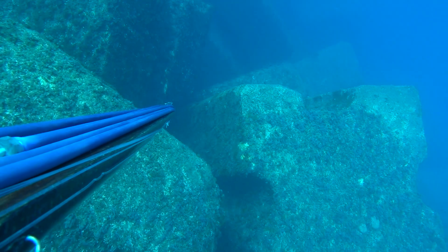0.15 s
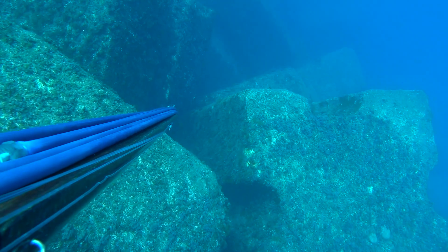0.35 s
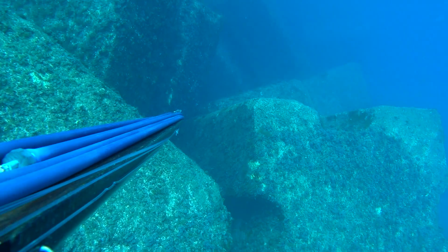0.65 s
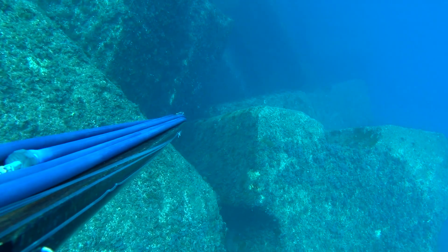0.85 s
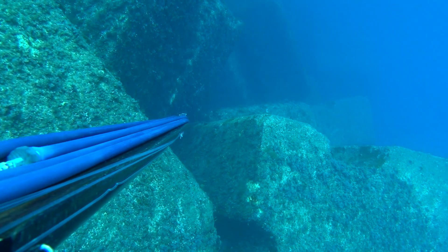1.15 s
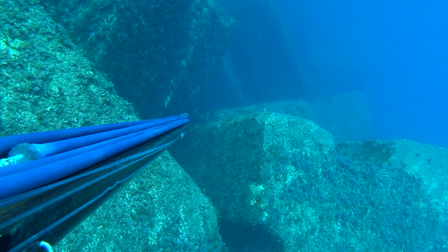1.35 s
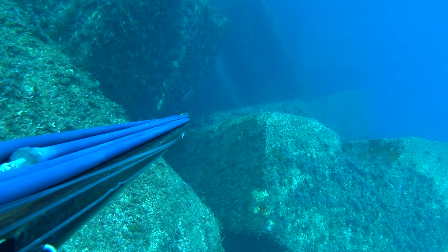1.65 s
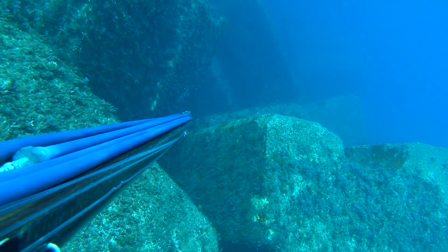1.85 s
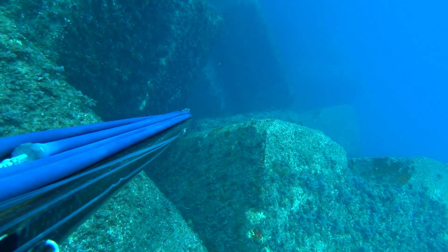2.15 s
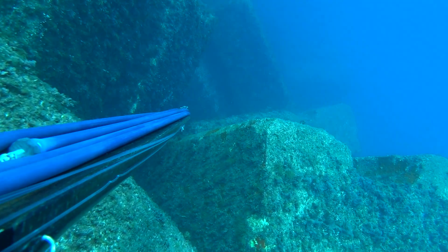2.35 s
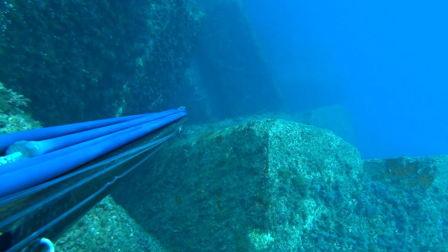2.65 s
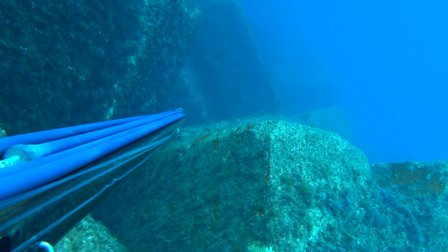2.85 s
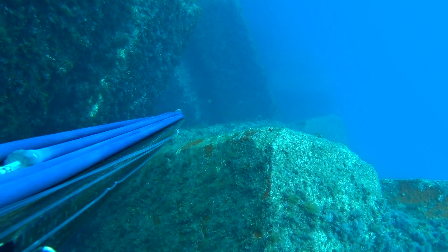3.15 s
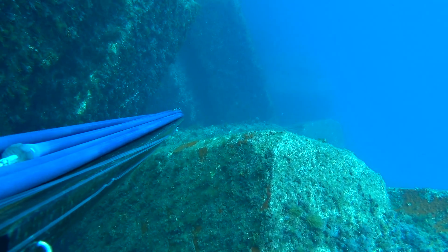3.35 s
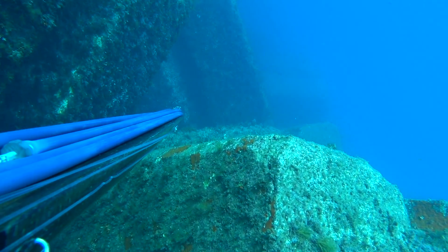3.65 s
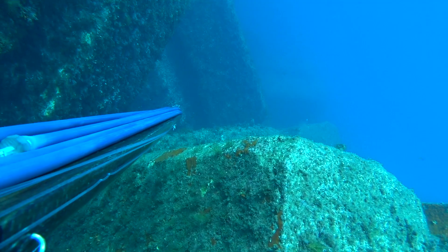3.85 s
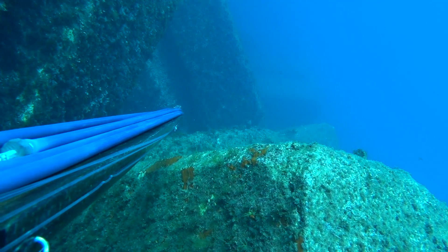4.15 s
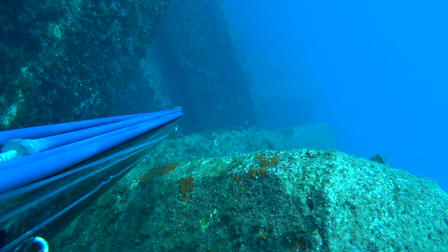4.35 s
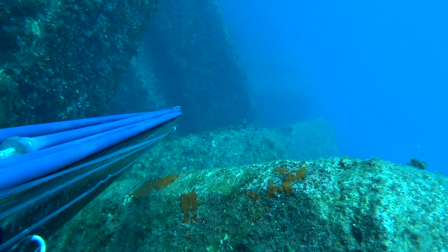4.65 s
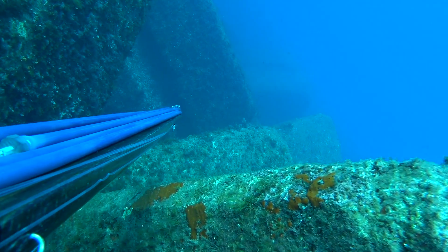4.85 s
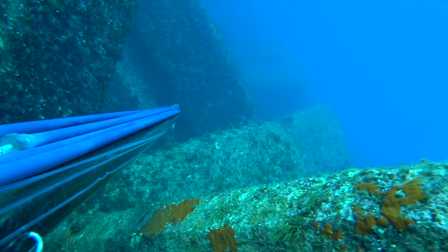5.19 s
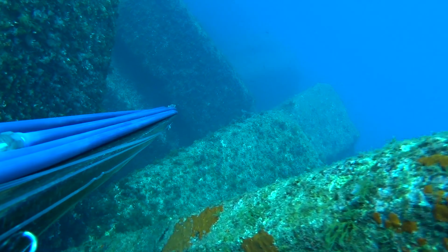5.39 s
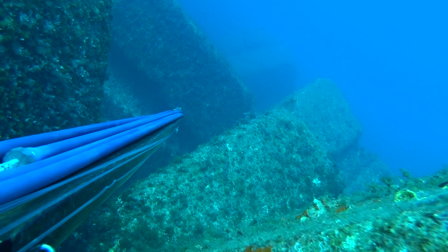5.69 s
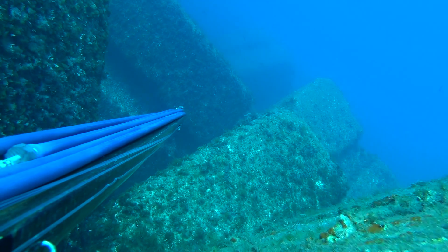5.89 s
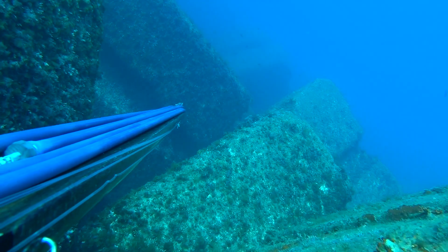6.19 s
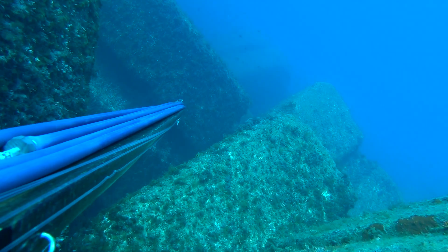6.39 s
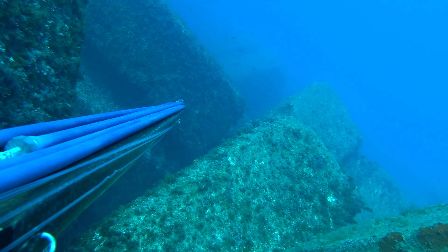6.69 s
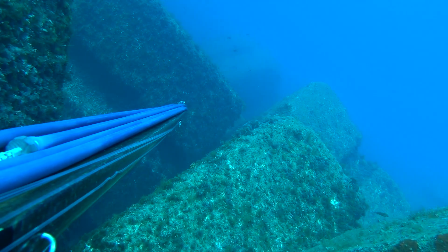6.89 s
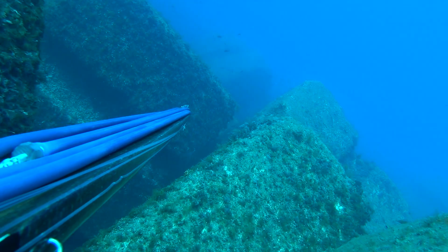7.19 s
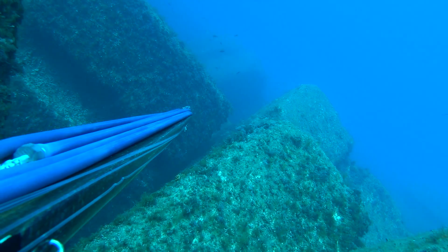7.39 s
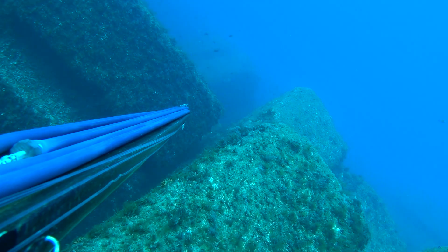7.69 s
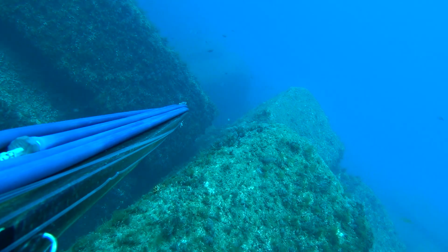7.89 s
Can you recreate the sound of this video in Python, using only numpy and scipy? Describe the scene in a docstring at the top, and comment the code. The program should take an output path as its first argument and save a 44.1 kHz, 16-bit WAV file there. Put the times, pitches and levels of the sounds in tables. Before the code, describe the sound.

Muffled water rumbles past a diver's gear while soft creaks, scattered shrimp clicks, a few hard knocks and dull thuds come and go.

```python
"""Water rumbles past at once, swaying and rubbing a camera's sealed housing on a diver's gear among rocks.
Shrimp snap near and far; mount knocks, soft creaking slips, dull bumps and scuffs come mingled throughout.
Rumble is coloured noise and sway two noisy low modes, both straight at the two microphones.
Rubbing, snaps, mount touches and bumps are noise or clicks ringing the housing modes.
Hiss and a faint electronic whine lie underneath."""
import sys
import numpy as np
from scipy import signal
from scipy.fft import rfft, irfft
from scipy.io import wavfile

SR = 44100
rng = np.random.default_rng(int(sys.argv[2]) if len(sys.argv) > 2 else 0)


def wav_record(signal):
    """Record a signal, one row per channel, as 16-bit PCM in the file named by sys.argv[1]."""
    frames = np.transpose(np.atleast_2d(signal))
    bounded = np.clip(frames, -1, 1)
    # unit amplitude maps onto the largest positive 16-bit level
    quanta = np.round(bounded * 32767).astype(np.int16)
    wavfile.write(sys.argv[1], SR, quanta)


N = 354123

# Streaming water: t/s, rumble level/dB, nominal rub level/dB, upper rumble re deep/dB
FLOW = [(0, -42.5, -56, -6.5), (.7, -43, -53, 0.5), (1.5, -45.5, -54.5, 2.5), (2.25, -45.5, -53.5, 2),
        (3.0, -46.5, -55, 4), (3.75, -50, -55.5, 4.5), (4.5, -46, -55.5, -5), (5.1, -51, -56, -4),
        (6.0, -49, -56, -3.5), (6.75, -48.5, -55, -0.8), (7.3, -45, -55.5, -0.5), (8.03, -53.5, -55.5, 2.5)]
# In-phase rumble spectrum: f/Hz, relative density/dB per Hz
RUMBLE_MID = [(15, -3), (26, 3), (50, -6.5), (100, -14), (200, -26.5), (500, -42), (800, -79)]
# Opposed rumble spectrum: f/Hz, relative density/dB per Hz
RUMBLE_SIDE = [(15, -22), (35, -13), (100, -21), (200, -30), (500, -34), (800, -60)]
# Sway modes: f/Hz, width/Hz, relative level/dB
SWAY_MODES = [(62, 3, -1), (167, 5.6, -13)]
# Soft brushes on the housing: t/s, length/s, nominal level/dB
SCUFFS = [(0.516, 0.04, -51), (2.888, 0.18, -42), (4.303, 0.029, -45), (6.46, 0.04, -42),
          (7.39, 0.024, -62)]
# Near shrimp snaps: t/s, nominal level/dB, top octave re level/dB, low body re level/dB
SNAPS = [(0.0125, -48, -9, -25), (0.1405, -40, -19, -18), (0.15, -44, -22, -22), (0.159, -58, -21, -19),
         (0.2633, -51, -1, -20), (0.999, -21, -57, -43), (1.191, -50, -25, -25), (1.2647, -52, -18, -22),
         (1.2708, -45, -8, -22), (1.3473, -54, -6, -20), (1.428, -49, -13, -20), (1.466, -41, -36, -9),
         (1.5204, -55, -14, -25), (1.5318, -57, 0, -20), (1.8195, -30.5, -47, -35), (1.95, -60, 5, -20),
         (1.9934, -51, -13, -20), (2.6262, -45.5, -21, -25), (2.7906, -56, -16, -17),
         (2.84, -45.5, -9, -19), (2.8734, -48, -3, -14), (2.9925, -58, -25, -25), (2.997, -44, 0, -15),
         (3.18, -48.5, -9, -20), (3.2335, -46.5, -16, -12), (3.2717, -43.5, -24, -22),
         (3.2994, -52, -15, -20), (3.4369, -49, -7, -23), (4.3604, -54, 1, -20), (4.6438, -60, 7, -20),
         (4.677, -58, -5, -20), (4.699, -54, -1, -19), (4.8738, -50.5, -20, -20), (4.91, -46.5, -20, -4),
         (4.92, -53, -1, -20), (4.989, -49.5, -16, -20), (5.0337, -44.5, -25, -24), (5.1157, -48, -25, -8),
         (5.1755, -47, -30, 3), (5.34, -52.5, -15, 2.5), (5.372, -48.5, -11, -7), (5.516, -47.5, -20, -10),
         (5.6377, -49.5, 3, -27), (5.733, -55, -7, -20), (5.8486, -50, -19, -12), (5.9059, -50, -4, -10),
         (6.0726, -50, -17, -20), (6.1754, -53.5, 1, -4), (6.314, -49, -17, -13), (6.3412, -42, -33, -1.5),
         (6.692, -49, -17, -20), (6.746, -52, -9, -20), (6.768, -50, -3, -11), (6.779, -55, -15, -16),
         (6.7873, -48.5, 5, -5), (6.9071, -55.5, 8, -13), (6.93, -51.5, -17, -3), (7.012, -52, -19, -6),
         (7.051, -46, -18, -5), (7.086, -37.5, -28, -6), (7.1082, -45, -23, -7), (7.2728, -53.5, -6, 6),
         (7.5212, -43.5, -13, -6), (7.6959, -47, -10, -11), (7.7678, -45, -19, -16), (7.967, -42, -23, -6)]
# Mount knocks, mostly hard, a few soft: t/s, nominal level/dB, upper modes re level/dB,
# modes over 3.5 kHz further/dB
KNOCKS = [(0.0355, -31, -25, -2), (0.0578, -26, 8.5, 0.5), (0.0845, -31, 7.5, -2), (0.0985, -35, -14, -18),
          (0.1239, -29.5, 4.5, -7), (1.2041, -23, 10.5, -0.5), (1.6425, -31.5, 1.5, -1),
          (1.702, -30, 9.5, 1.5), (4.0034, -24.5, -27, 11), (7.753, -26.5, -29, 17.5),
          (7.7859, -29.5, 6.5, 4), (7.8361, -35, 4, -2.5), (7.8725, -30.5, 4, -2)]
# Nominal touches of one knock: delay/s, level/dB, modes over 3.5 kHz further/dB
REBOUNDS = [(0, 0, -0.5), (.0015, -7.5, -5), (.004, -12, -12)]
# Soft creaking slips: t/s, nominal level/dB, upper modes re level/dB
SLIPS = [(0.1374, -39, -15), (0.166, -47, -21), (0.196, -41, -25), (0.2762, -36.5, -21), (0.2911, -34, -19),
         (0.2998, -33.5, -23), (0.306, -38, -21), (0.3202, -33.5, -28), (0.3344, -44, -27),
         (0.349, -39, -21), (0.362, -35, -28), (0.382, -35, -26), (0.3962, -38, -21), (0.407, -37, -25),
         (0.4156, -34, -10.5), (0.4282, -34, -24), (0.4363, -37, -22), (0.4485, -32, -21),
         (0.465, -35, -25), (0.5062, -34, -26), (0.5301, -48, -28), (0.627, -42, -16), (0.6407, -36.5, -14),
         (0.6756, -41, -21), (0.6927, -45, -23), (0.7194, -37, -31), (0.863, -39, -16), (0.8773, -42, -21),
         (0.9202, -38.5, -21), (1.0052, -35, -27), (1.0185, -42, -21), (1.028, -34.5, -12),
         (1.0402, -33, -24), (1.051, -43, -21), (1.0717, -37, -17), (1.2554, -43, -21), (1.27, -45, -21),
         (1.278, -52, -19), (1.319, -42, -23), (1.3614, -36, -15), (1.3754, -37.5, -23), (1.4435, -44, -9),
         (1.46, -37.5, -18), (1.4769, -38, -19), (1.4916, -38, -15), (1.5122, -44, -23), (1.6044, -41, -26),
         (1.7952, -51, -21), (1.8117, -38, -21), (1.873, -40, -21), (1.887, -39, -21), (1.928, -40.5, -28),
         (1.966, -35.5, -30), (2.1446, -33, -39), (2.161, -43, -23), (2.1763, -36, -33),
         (2.2128, -41.5, -27), (2.2651, -52, -21), (2.2823, -37, -15), (2.3033, -38, -33),
         (2.322, -46, -21), (2.338, -38, -24), (2.357, -41, -21), (2.391, -40.5, -19), (2.4288, -38.5, -27),
         (2.527, -42, -30), (2.5435, -40, -23), (2.5663, -40, -24), (2.584, -43, -26), (2.6005, -35.5, -25),
         (2.616, -41.5, -25), (2.752, -41.5, -25), (2.7707, -34.5, -30), (2.785, -36, -17),
         (2.972, -37.5, -15), (3.0439, -39.5, -12), (3.202, -38, -27), (3.2835, -40, -28),
         (3.2916, -37, -33), (3.378, -46, -25), (3.4012, -35, -35), (3.426, -46, -21), (3.4447, -42, -29),
         (3.4565, -41, -25), (3.468, -44, -23), (3.498, -43, -23), (3.5295, -48, -26), (5.391, -38, -27),
         (5.486, -47, -23), (5.5345, -45.5, -23), (5.7718, -47, -21), (6.523, -40, -24),
         (7.0575, -42.5, -17), (7.4038, -39.5, -23), (7.5856, -41, -27), (7.6667, -42.5, -23),
         (7.7126, -39.5, -23), (7.8167, -37, -25), (7.8319, -37, -15), (7.9186, -36.5, -23),
         (7.9995, -45.5, -18)]
# Dull bumps on the housing: t/s, nominal level/dB
BUMPS = [(0.6607, -25.5), (2.9035, -35), (2.952, -34), (3.0065, -33), (4.314, -36), (6.4319, -28.5),
         (7.1646, -30), (7.3692, -28), (7.388, -32), (7.4945, -27.5)]
# Housing modes: f/Hz, t60/s, struck level/dB, extra for snaps from the water/dB
HOUSING_MODES = [ (255.7, 0.083, -21.5, -40), (400, 0.024, -11.5, -38), (625, 0.016, -6, -39),
                 (764, 0.032, -9.5, -21), (904, 0.13, -20, -38), (1077, 0.017, -3, -20),
                 (1209, 0.0097, 2.06, -24), (1412, 0.013, -1.5, -19), (1736, 0.017, -6.5, -17),
                 (2036, 0.011, 1, 4), (2285, 0.0049, 5.5, 7.5), (2757, 0.01, -11.5, 20),
                 (3385.2, 0.017, -26.5, 24), (3944, 0.012, -8, -12), (4470, 0.0076, -10, -7),
                 (5042, 0.0048, -3, -2), (5520, 0.0039, -9.5, 9), (6540, 0.0034, -18.5, 18),
                 (7120, 0.0025, -36.5, 25.5), (11380, 0.0014, -33, 35.5), (15400, 0.00051, -33.5, 41)]
# Same modes at the right microphone: level re left/dB, phase lag/rad
RIGHT_MODES = [(-2, 2), (-1, 4), (0, 3.5), (-3, 2.5), (-0.5, 3.0), (-0.5, 3), (-3, 4), (-1, 4.5), (2, 4.5),
               (-3, 2.02), (-4, 2.5), (0.45, 2.5), (-0.5, 1.5), (-5.5, 3.5), (-13, 1.8), (3.5, 2),
               (3, 1.76), (0, 1.83), (6, 0.6), (-3.5, 0.4), (-0.5, 0.5)]
# Hiss spectrum: f/Hz, relative density/dB per Hz
HISS = [(300, -12.5), (1500, -3.5), (2300, -10.5), (3300, -15), (6000, -21), (9000, -23.5), (16000, -24.5)]

MIDDLING_FLOW_DB = -48   # upper rumble at which sway has its base level
SWAY_DB, SWAY_DB_PER_FLOW_DB, SWAY_GUSTS_DB = -56.5, 1.0, -2
FAR_SNAPS_PER_S, FAR_SNAPS_DB = 270, -85   # nominal rate
FAINT_SNAPS_PER_S = 9
# level, top octave, low body
FAINT_SNAP_DB, FAINT_SNAP_SPREAD_DB = (-60, -15, -17), (2.0, 3.0, 4.5)
SNAP_SMEAR_S = 0.00072   # mean of random delays
FORERUNNER_S, FORERUNNER_DB = 0.0025, -15.5
CONTACT_CUT_HZ, BUMP_CUT_HZ = 7300, 1090
KNOCK_GRIT_DB, SLIP_GRIT_DB = -29.5, -28.5
CHATTER_S, CHATTER_GROWTH_DB = 0.000812, 4.5   # per touch of a slip
AFTER_SLIP_S, AFTER_SLIP_DB = .006, -11   # nominal
HISS_DB = -61
WHINE_HZ, WHINE_DB = 11240, -92
STOPBAND_HZ = 16000


def amp(db):
    """dB to gain."""
    return 10 ** (np.asarray(db) / 20)


def rms_one(x):
    """Scale to rms 1."""
    return x / np.sqrt(np.mean(x ** 2) + 1e-20)


def in_time(rows):
    """Interpolate table columns to one value a sample."""
    s, *columns = np.transpose(rows)
    return [np.interp(np.arange(N) / SR, s, c) for c in columns]


def drift(rate_hz):
    """Slow noise of rms 1: two equal poles, run every 40 samples."""
    r = np.exp(-80 * np.pi * rate_hz / SR)
    noise = rng.standard_normal(N // 40 + 2002)
    slow = signal.lfilter([1], [1, -2 * r, r * r], noise)[2000:]   # settled part
    return np.interp(np.arange(N) / 40, np.arange(len(slow)), rms_one(slow))


def coloured(points):
    """Noise shaped to a spectrum table."""
    hz, db = np.transpose(points)
    bins_hz = np.arange(N // 2 + 1) * SR / N + 1e-3   # avoids log(0)
    gain = amp(np.interp(np.log(bins_hz), np.log(hz), db))
    return irfft(rfft(rng.standard_normal(N)) * gain, N)


def low_pass(x, hz, order):
    """Butterworth low-pass."""
    return signal.sosfilt(signal.butter(order, hz, fs=SR, output="sos"), x)


def train(times_s, gains):
    """One-sample clicks at given times."""
    out = np.full(N, 1e-18)
    np.add.at(out, np.minimum((times_s * SR).astype(int), N - 1), gains)
    return out


def scattered(clicks, scatter_db, t60_s):
    """Clicks, each trailed by decaying noise."""
    tail = signal.lfilter([0, 1], [1, -amp(-60 / (t60_s * SR))], clicks)
    return clicks + amp(scatter_db) * tail * rng.standard_normal(N)


def own_strengths(count, spread_db):
    """Random dB offset per event, keyed by mode frequency."""
    offsets_db = spread_db * rng.standard_normal((count, len(HOUSING_MODES)))
    return dict(zip(np.transpose(HOUSING_MODES)[0], offsets_db.T))


def streaming(rumble_db, upper_db):
    """Turbulence presses on both microphones alike, plus a weaker opposed part."""
    mid, side = coloured(RUMBLE_MID), coloured(RUMBLE_SIDE)
    deep = low_pass(mid, 55, order=1)
    mid = deep + (mid - deep) * amp(upper_db)
    return amp(rumble_db + drift(3)) / np.std(deep) * (mid + side * [[1], [-1]])


def sway(flow_db):
    """Eddies keep two low modes ringing, harder in faster water; microphones move in opposition."""
    out = 0
    for hz, width_hz, db in SWAY_MODES:
        phase = 2 * np.pi * hz * np.arange(N) / SR
        out = out + amp(db) * (drift(width_hz) * np.sin(phase) + drift(width_hz) * np.cos(phase))
    level_db = SWAY_DB + SWAY_DB_PER_FLOW_DB * (flow_db - MIDDLING_FLOW_DB)
    return amp(level_db + SWAY_GUSTS_DB * drift(1.3)) * out * [[1], [-1]]


def rubbing(rub_db):
    """Fine eddies rub the housing all the time; scuffs catch and let go in swells of duller grains."""
    t, swell = np.arange(N) / SR, np.zeros(N)
    for s, length_s, db in SCUFFS:
        swell += amp(db) * np.sin(np.pi * np.clip((t - s) / length_s, 0, 1))
    grains = 8 * rng.standard_normal(N) * (rng.random(N) < 350 / SR)   # 350 per s
    scuffs = swell * low_pass(grains, 870, order=4)
    water = low_pass(rng.standard_normal((2, N)), 1275, order=2)
    water = amp(rub_db - 13.5 + 1.44 * drift(12.0)) * water
    water -= low_pass(water, 420, order=1)   # fine eddies hardly move the low modes
    return lambda hz, water_db: amp(-13.0) * scuffs + water[rng.integers(2)]


def faint_snaps():
    """Middle-distance snaps at random times, as rows like SNAPS."""
    count = int(FAINT_SNAPS_PER_S * N / SR)
    levels_db = FAINT_SNAP_DB + FAINT_SNAP_SPREAD_DB * rng.standard_normal((count, 3))
    return np.c_[rng.random(count) * N / SR, levels_db]


def shrimp():
    """Snap: faint forerunner, double click, dull rock echoes; far snaps merge into crackle and wash."""
    s, db, top_db, body_db = np.vstack([SNAPS, faint_snaps()]).T
    own_db = own_strengths(count=len(s), spread_db=3.5)
    returned = train(s, amp(np.minimum(db, -38)))   # nearest snaps stand far above their echoes
    echoes = scattered(returned, -18.5, 0.088) - returned
    snaps = train(s, amp(db))
    echoes += scattered(snaps, -46.0, 0.3) - snaps   # far walls answer longer
    sizes = amp(1.3 * np.minimum(rng.exponential(1, N), 4)) * rng.choice([-1, 1], N)
    born = rng.random(N) < FAR_SNAPS_PER_S * amp(4.0 * drift(8)) / SR
    crackle = amp(FAR_SNAPS_DB) * rms_one(sizes * born)
    wash = amp(-81.5) * rng.standard_normal(N)

    def drive(hz, water_db):
        patchy = amp(5.6 * drift(32))   # snaps from other sides favour other modes
        if hz > 8000:
            colour_db, diffuse_db = top_db + 7.0, -3
        elif hz < 3400:
            colour_db, diffuse_db = body_db, -12
        else:
            colour_db, diffuse_db = 0, 0
        if 6000 < hz < 8000:   # dull snaps fade from 6 kHz up
            colour_db = colour_db + 0.47 * (top_db + 15.5)
        late_s = SNAP_SMEAR_S * rng.exponential(1, (len(s), 3))   # uneven arrival at each mode
        gain = amp(db + colour_db + own_db[hz])
        near = train(s + late_s[:, 0], gain) - 0.2 * train(s + late_s[:, 1], gain)
        near = near + amp(FORERUNNER_DB) * train(s - FORERUNNER_S + late_s[:, 2], gain)
        near = near + amp(-9 * (hz > 8000) + diffuse_db) * echoes
        far = amp(diffuse_db) * (patchy * crackle + wash)
        return amp(water_db) * (near + far)
    return drive


def knock_touches():
    """A knock rebounds twice, unevenly, weaker and duller."""
    uneven = rng.uniform(.75, 1.25, (len(KNOCKS), len(REBOUNDS)))
    touches = []
    for k, (delay_s, db, top_db) in enumerate(REBOUNDS):
        touches.append(KNOCKS + np.outer(uneven[:, k], [delay_s, db, 0, top_db]))
    return np.vstack(touches)


def creak_slips():
    """A slip builds in four touches, then a smaller slip follows in the same way."""
    slips = np.c_[SLIPS, np.zeros(len(SLIPS))]
    uneven = rng.uniform(.6, 1.5, (len(SLIPS), 4))
    slips = np.vstack([slips, slips + uneven * [AFTER_SLIP_S, AFTER_SLIP_DB, 0, 0]])
    steps = [[(k - 2) * CHATTER_S, (k - 3) * CHATTER_GROWTH_DB + 3.5, 0, 0] for k in range(4)]
    return np.vstack([slips + step for step in steps])


def mount():
    """Each mount touch strikes every mode with its own strength, then grates on briefly."""
    knocks, slips = knock_touches(), creak_slips()
    s, db, upper_db, top_db = np.vstack([knocks, slips]).T
    knock_db = own_strengths(count=len(knocks), spread_db=3.0)
    slip_db = own_strengths(count=len(SLIPS), spread_db=2.0)
    grit_db = np.r_[np.full(len(knocks), KNOCK_GRIT_DB), np.full(len(slips), SLIP_GRIT_DB)]
    rough = train(s, amp(db + grit_db))
    grit = scattered(rough, 0, 0.048) - rough

    def drive(hz, water_db):
        # soft contacts mostly reach modes near 1 kHz, hard ones upper and lower modes too
        hard = .4 if hz < 800 else np.interp(np.log(hz), np.log([1340, 1670, 1950, 2900]), [0, .55, .6, 1])
        own_db = np.r_[knock_db[hz], np.resize(slip_db[hz], len(slips))]   # a slip's touches share theirs
        touches = train(s, amp(db + hard * upper_db + (hz > 3500) * top_db + own_db))
        return low_pass(touches + amp(-22 * hard) * grit, CONTACT_CUT_HZ, order=4)   # rubber-soft contact
    return drive


def bumping():
    """A dull, rough bump drives only the lower modes, the lowest but little."""
    s, db = np.transpose(BUMPS)
    own_db = own_strengths(count=len(s), spread_db=2.5)

    def drive(hz, water_db):
        clicks = train(s, amp(db + 1.0 + own_db[hz]))
        thud = low_pass(scattered(clicks, -25, 0.023), BUMP_CUT_HZ, order=4)
        return thud - low_pass(thud, 340, order=1)
    return drive


def housing(*drives):
    """Damped modes, excited by each drive(hz, water_db), ring in both microphones; the right one lags."""
    out = np.zeros((2, N))
    for (hz, t60_s, db, water_db), (right_db, lag_rad) in zip(HOUSING_MODES, RIGHT_MODES):
        r, w = amp(-60 / (t60_s * SR)), 2 * np.pi * hz / SR
        band_hz = [hz / 1.357, min(hz * 1.231, .45 * SR)]
        near = signal.butter(2, band_hz, "band", fs=SR, output="sos")
        x = signal.sosfilt(near, sum(drive(hz, water_db) for drive in drives))   # builds over a cycle
        x = amp(db) * (-x if hz > 13000 else x)   # top mode swings against its neighbour
        poles = [1, -2 * r * np.cos(w), r * r]
        out[0] += signal.lfilter([0, r * np.sin(w)], poles, x)
        right_zeros = [-np.sin(lag_rad), r * np.sin(w + lag_rad)]
        out[1] += amp(right_db) * signal.lfilter(right_zeros, poles, x)
    return out


def scene():
    """All sources at the two microphones."""
    rumble_db, rub_db, upper_db = in_time(FLOW)
    water = streaming(rumble_db, upper_db) + sway(rumble_db + upper_db)
    return water + housing(rubbing(rub_db), shrimp(), mount(), bumping())


def record(dry):
    """Add separate hiss per channel and a shared electronic whine, then cut the top steeply."""
    hiss = amp(HISS_DB) * rms_one(np.array([coloured(HISS), coloured(HISS)]))
    whine = amp(WHINE_DB) * np.sin(2 * np.pi * WHINE_HZ * np.arange(N) / SR)
    top_cut = signal.cheby2(14, 60, STOPBAND_HZ, fs=SR, output="sos")
    return signal.sosfilt(top_cut, dry + hiss + whine)


dry = scene()
out = record(dry)
wav_record(out)
```